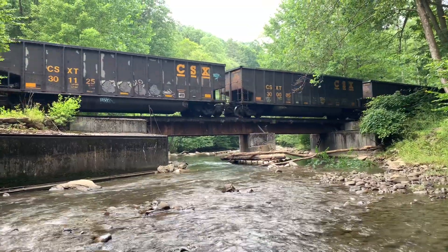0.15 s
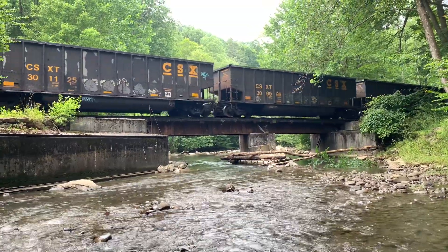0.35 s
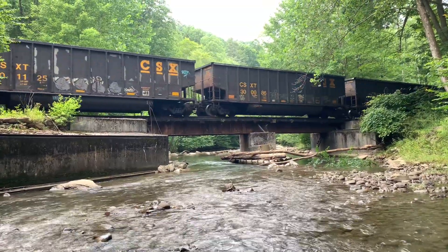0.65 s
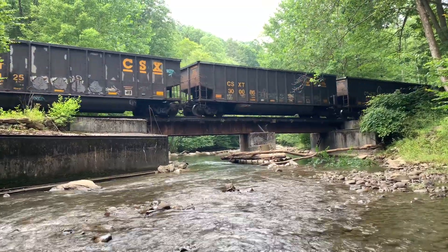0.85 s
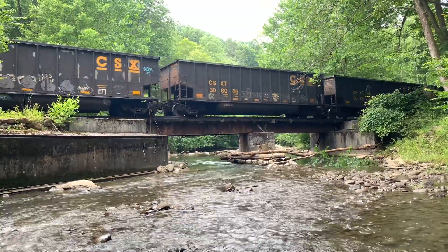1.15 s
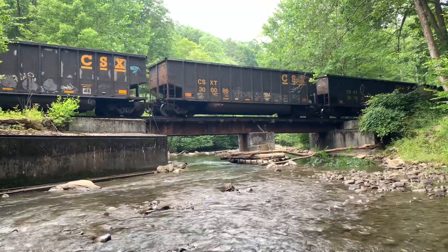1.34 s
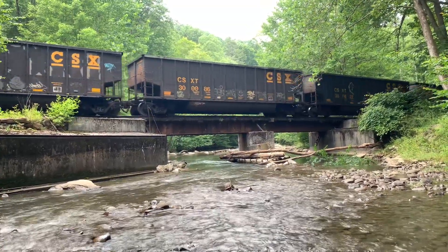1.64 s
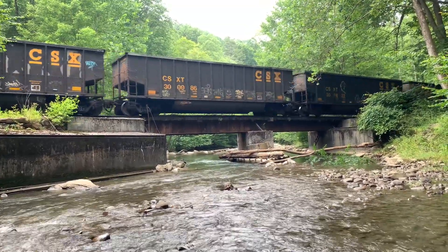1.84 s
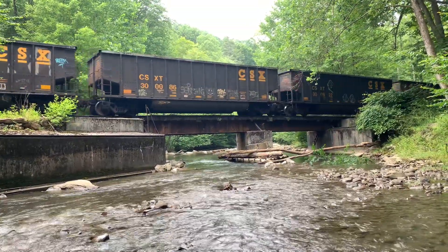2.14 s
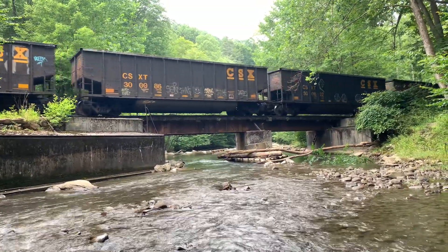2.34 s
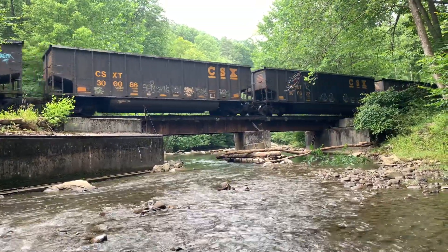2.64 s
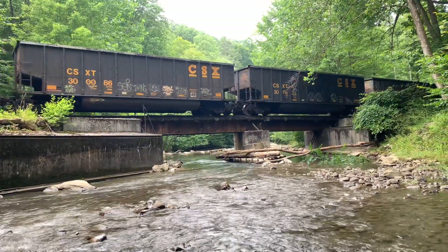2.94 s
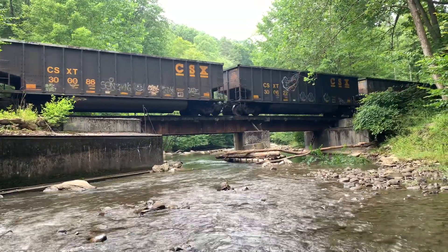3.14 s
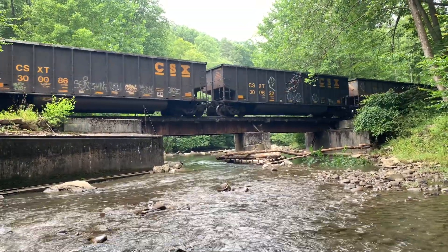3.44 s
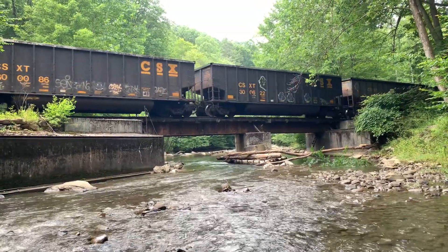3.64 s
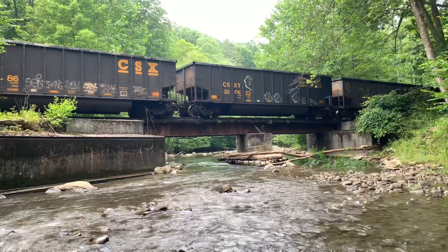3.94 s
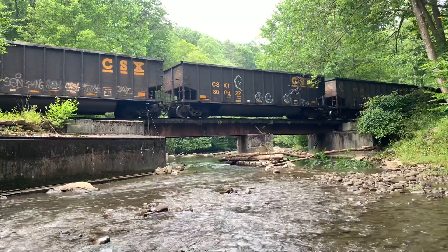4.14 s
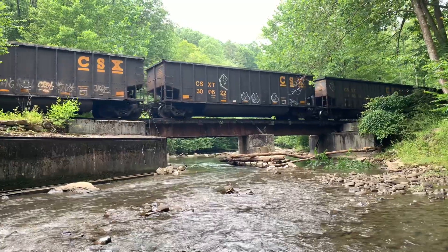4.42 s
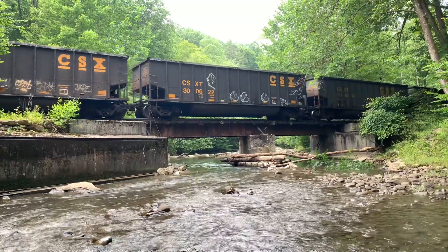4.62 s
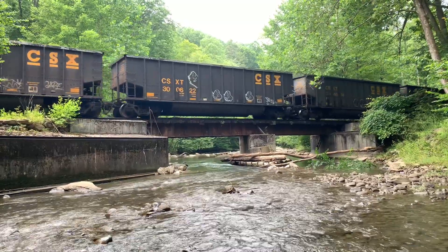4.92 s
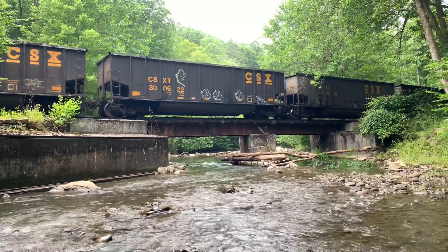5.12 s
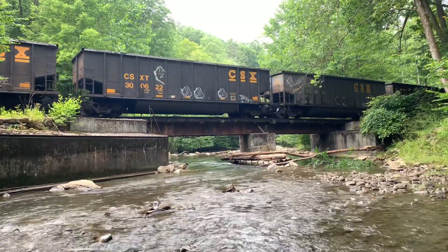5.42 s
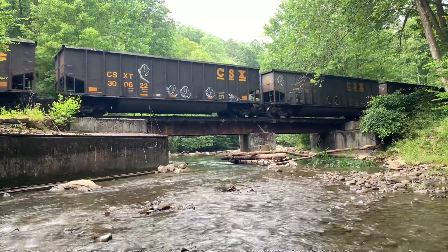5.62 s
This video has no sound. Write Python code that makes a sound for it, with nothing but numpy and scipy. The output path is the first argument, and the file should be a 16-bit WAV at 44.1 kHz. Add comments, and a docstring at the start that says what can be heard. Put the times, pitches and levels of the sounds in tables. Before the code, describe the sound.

Heavy freight cars rumble steadily over a steel girder bridge, wheels knocking in clusters at rail joints with metallic clatter, rattles and faint thin squeals.

```python
"""Freight train on a girder bridge

Loaded hopper cars roll over a steel girder bridge above a shallow creek. Rough treads drive the span's
bending modes; blows at rail joints and in slack gear boom in the girders, clatter and ring the wheels.
Flanges sing thinly now and then by stick and slip, and small ringing bubbles make the water fizz."""
import sys
import numpy as np
from scipy import signal
from scipy.fft import rfft, irfft
from scipy.io import wavfile
from scipy.ndimage import uniform_filter1d

SR = 44100
rng = np.random.default_rng(int(sys.argv[2]) if len(sys.argv) > 2 else 0)


def to_wav(sig):
    """Store sig (one row per channel, or 1-D mono) as 16-bit WAV at the path in sys.argv[1].

    Samples outside -1..1 are clipped; the rate is SR.
    """
    pcm = np.clip(np.atleast_2d(sig), -1, 1) * 32767
    pcm = np.round(pcm).astype(np.int16)
    wavfile.write(sys.argv[1], SR, pcm.T)  # frames by channels


N = 254456
TIME = np.arange(N) / SR
BINS = np.maximum(np.arange(N // 2 + 1) * SR / N, 1)  # Hz

# All levels in the tables are relative; the settings in scene() place each layer.

# Level curves of the bending span and its deck. Each row: time in seconds, level in dB.
DEEP_SWAY = [(0, -22), (.28, -29), (.55, -23), (.85, -22.5), (1.05, -23.5), (1.4, -21), (1.75, -25.5),
             (2.1, -20.5), (2.55, -19), (2.8, -21), (3.0, -20.5), (3.45, -26.5), (3.85, -20), (4.2, -27),
             (4.7, -23.5), (5.4, -20.5), (5.65, -20), (5.77, -31)]  # range of the deepest bending mode
UPPER_SWAY = [(0, -26), (.18, -23.5), (.31, -18.5), (.55, -24), (.9, -24), (1.1, -22.5), (1.45, -21),
              (1.65, -18), (1.95, -27), (2.45, -22), (2.75, -26.5), (3.2, -29), (3.35, -22.5), (3.55, -25),
              (4.1, -23.5), (4.35, -20.5), (5.2, -21.5), (5.77, -24)]  # range of the second bending mode
DECK_DRUM = [(0.0, -28.5), (2.17, -26.5), (4.03, -28), (4.13, -30.5), (4.32, -30.5), (4.5, -22.5),
             (4.53, -26.5), (4.85, -31), (4.87, -27), (5.16, -27.5), (5.26, -21.5), (5.37, -33),
             (5.56, -26.5), (5.77, -26.5)]  # drumming of the deck
DEEP_TOP_HZ, UPPER_TOP_HZ = 72, 112  # where the three ranges meet
# Bending resonances of the span. Each row: frequency in Hz, width in Hz, lift in dB.
GIRDER_MODES = [(57, 9, 5), (87, 9, 5.5), (131, 8, 2.5), (171, 8, 6.5)]

# Rolling between the knocks. Each row: time in seconds, roar level in dB, hiss level in dB.
ROLLING = [(0.0, -34.5, -44), (0.29, -34.5, -44.5), (0.66, -36.5, -47), (1.53, -35.5, -48.5),
           (2.01, -34.5, -45.5), (2.23, -35, -46), (3.25, -35.5, -47), (3.97, -37.5, -47),
           (4.23, -35.5, -47.5), (4.9, -36, -47), (5.48, -34.5, -48), (5.77, -35.5, -45.5)]

# Spectra of the radiating bodies. Each row: frequency in Hz, level in dB per Hz.
SPAN_SPECTRUM = [(12, -28), (26, -1), (42, -0.5), (58, 4), (73, -2), (90, -2), (104, -8.5), (145, -11),
                 (200, -19), (250, -31), (290, -50), (380, -69), (1500, -110)]
ROAR_SPECTRUM = [(150, -65), (230, 5.5), (295, -13), (360, 1.5), (540, 2.5), (690, -1), (810, -11),
                 (1050, -8.5), (1900, -13.5), (2600, -18), (3600, -65), (8000, -64)]
HISS_SPECTRUM = [(500, -3.5), (1500, 7.5), (2800, 3), (4100, 4), (5000, -4.5), (6300, -0.5), (7200, -12),
                 (8400, -1.5), (10300, -7), (12200, -23), (13400, -14.5), (14600, -38)]
BOOM_SPECTRUM = [(120, -53), (295, -2), (360, 1), (450, 2), (530, 11.5), (690, 8.5), (820, -9), (1300, -54),
                 (5000, -80)]  # girders under a blow
CLATTER_SPECTRUM = [(250, -50), (600, -40), (830, -21), (1050, 9.5), (1400, 7), (1650, 6), (2150, 5),
                    (2700, -27), (3400, -16), (9000, -76)]  # sheet steel of the cars
CLANG_SPECTRUM = [(900, -37), (2000, 7), (2800, 2.5), (4100, 2.5), (5100, -7), (6400, 0), (7200, -9),
                  (9500, -8), (12000, -23.5), (15000, -26)]  # running gear
CRACK_SPECTRUM = [(1200, -15), (2500, 3.5), (3300, -2), (4400, -5), (5100, -22), (5700, 5), (6500, -12),
                  (7300, -7.5), (9800, -7), (12000, -17), (15000, -34)]  # steel on steel

# Rail joints. Each row: first axle in seconds, crossing time in seconds, clatter in dB, girder boom in dB,
# gear clang in dB, girder note in Hz, panel note in Hz, second wheel in dB, then axles 1 to 4 in dB.
JOINTS = [(0.126, 1.100, -23, -33, -47, 544, 1200, -7.5, 0, -1.5, -8.5, -4),
          (0.289, 1.113, -32, -33.5, -46, 509, 1556, -6.5, 1, -6, 3, 2),
          (1.700, 1.083, -24, -26.5, -44, 481, 1107, -3, -3.5, -4, 2, -2),
          (1.785, 1.080, -25, -29, -44.5, 443, 1360, -3, 0, -0.5, -3, -16),
          (1.835, 1.075, -19.5, -25, -49, 554, 1155, -16, -9.5, -7, -9, -5)]
# Single knocks, faint to heavy, of wheels and slack gear. Each row: time in seconds, clatter in dB,
# girder boom in dB, gear clang in dB, girder note in Hz, panel note in Hz, panel ring in dB.
SINGLE_KNOCKS = [(0.138, -33, -40, -50, 540, 1930, -42), (0.205, -35, -24.5, -60, 525, 1350, -39),
                 (0.645, -26, -24, -43.5, 543, 960, -41), (0.715, -40, -37, -60, 563, 920, -40.5),
                 (0.875, -25.5, -37, -50, 525, 1145, -39), (0.89, -34, -45, -46, 509, 1720, -43),
                 (1.052, -38, -32, -59, 483, 1700, -42), (1.23, -41, -49, -55, 540, 2000, -44),
                 (1.407, -24.5, -25, -60, 500, 1620, -32), (2.048, -22, -29, -40, 564, 2620, -35.5),
                 (2.172, -25, -27, -52, 502.8, 1010, -47), (2.431, -35, -35, -55, 494, 1134, -38),
                 (2.472, -25, -26, -45, 489, 2040, -40), (2.545, -37, -32, -45, 448, 1220, -46),
                 (2.679, -32, -35, -59, 602.4, 1187, -36), (2.812, -22, -27, -42, 527, 1693, -39),
                 (2.908, -31, -26.5, -60, 670, 1440, -45), (3.115, -40, -45, -60, 545, 1420, -38.5),
                 (3.168, -33, -37, -58, 533, 1030, -43), (3.19, -21.5, -33, -41.5, 494, 1870, -42),
                 (3.24, -28, -23.5, -60, 633, 1756, -44), (3.345, -25, -24.5, -42, 534, 1360, -44),
                 (3.54, -40, -33, -53, 570, 1073, -35), (3.688, -41, -29, -54, 472, 1440, -48),
                 (3.935, -27, -42, -62, 570, 1910, -44), (4.105, -22.5, -22.5, -43, 488, 1366, -38.5),
                 (4.285, -34, -43, -52, 524, 1980, -44), (4.36, -28, -28, -52, 522, 1187, -44),
                 (4.40, -33, -43, -60, 510, 1330, -43), (4.46, -28, -26.5, -57, 533, 1647, -36),
                 (4.752, -33, -38, -48, 523, 1675, -40), (4.800, -40, -41, -40, 670, 1064, -52),
                 (4.848, -20, -32, -44, 583, 1960, -35), (4.925, -21, -28, -48, 447, 1750, -40),
                 (5.098, -27, -28.5, -53, 558, 2660, -42), (5.214, -27, -23, -47, 550, 1970, -37),
                 (5.477, -19, -42, -50, 520, 1015, -34), (5.503, -29, -23, -43, 515, 2550, -36.5),
                 (5.522, -38, -23, -58, 441, 1144, -47), (5.568, -36, -40, -51, 516, 2190, -42)]
# The four axles either side of a coupler. Each entry: share of the crossing time.
AXLES = [0, .321, .678, 1]
# Cars in order of passing, the heavier booming more in the girders. Each entry: added boom in dB.
CARS_BOOM_DB = [1.5, 0]
CAR_S = 3.05  # one car passes in this time, so the same group of axles strikes each joint again
SECOND_WHEEL_S = .029  # delay between the two wheels of an axle
SCATTER_DB, SCATTER_OCTAVES = -2.04, .1  # factors on normal chance for strength and girder pitch
JOINT_PANEL_DB = -13.5  # panel ring relative to the clatter at a joint

# A truck drops its weight on the deck. Each row: time in seconds, level in dB, central pitch in Hz.
THUDS = [(1.038, -17, 131), (1.37, -17.5, 127.7), (1.82, -21, 176.7), (2.048, -25, 165), (2.23, -22, 174),
         (2.43, -22, 151.4), (2.561, -29, 162), (2.789, -19.5, 138), (3.32, -30, 136.7),
         (4.101, -17.5, 151.8), (4.111, -26, 204), (4.449, -22, 147), (4.87, -21, 181.4),
         (5.22, -15.5, 146), (5.49, -25, 160.6), (5.649, -19.5, 158.8)]

# Wheel modes. Each row: frequency in Hz, level in dB, 60 dB decay time in seconds.
WHEEL_MODES = [(2606, -1, .3), (3165, -4, .25), (3240, -6, .3), (3332, -6, .45), (3787, -1, .36),
               (4016, -5, .75), (4521, -6, .7), (4813, -9, .55), (5035, -14, .7), (5595, -11, .7),
               (5690, -3, .85), (6215, -10, .45), (6460, -4, .65)]
# Hard blows that ring a wheel. Each row: time in seconds, ring in dB, most excited pitch in Hz,
# reach in octaves, this wheel's tuning in cents, chatter in dB, crack in dB.
WHEEL_BLOWS = [(0.314, -37.5, 3450, .25, 3.5, -51, -41), (1.049, -36, 3300, 0.2, 1, -48, -50),
               (1.404, -51, 3800, .4, 1, -55, -43), (1.697, -45, 3700, .4, -1, -57, -34),
               (2.043, -38, 5770, 0.5, -12.5, -54, -34), (2.15, -48, 5700, 0.54, -13, -54, -35),
               (2.455, -39, 4960, 0.7, 1, -52, -36), (2.547, -38, 4230, .2, 5.5, -49, -47),
               (2.815, -46, 6100, 0.18, -2, -51, -48), (3.348, -35, 3360, 0.23, -2.5, -46, -42),
               (4.119, -29.5, 3720, 0.21, 0, -35, -30), (4.752, -39, 2600, 0.22, -2, -41, -34),
               (4.80, -41, 4470, 0.58, -16, -51, -45), (5.498, -43, 5900, .35, 3, -49, -39),
               (5.533, -41, 3370, 0.5, -3, -47, -46), (5.565, -41.5, 5600, 0.68, 2.5, -56, -48)]

# Flange squeals. Each row: start in seconds, swell in seconds, length in seconds, pitch in Hz,
# glide in Hz per second, width of the bunch in Hz, level in dB, left minus right in dB.
SQUEALS = [(-.02, 0.045, 0.2, 8160, 0, 99, -46.5, -6), (0.077, 0.043, 0.23, 8620, -3, 85, -42.5, -7),
           (0.625, 0.037, 0.22, 8630, -300, 120, -47, -11), (.904, 0.02, 0.19, 9560, 0, 80.5, -51.5, -6),
           (1.84, .025, .08, 7800, -3000, 90, -49, -2), (3.017, 0.12, 0.41, 8500, 0, 455, -48.5, -6),
           (3.223, 0.021, 0.24, 9650, -300, 64.2, -45, -6), (3.26, 0.038, .18, 10100, 0, 90, -63, -7),
           (3.31, 0.17, .31, 13880, -700, 191, -50, 0), (3.423, 0.18, .47, 13400, 0, 400, -57, 0),
           (3.87, .18, 0.45, 11900, 0, 380, -64, -3), (4.67, 0.23, 0.44, 8670, 0, 443, -55, -1),
           (5.01, 0.1, 0.5, 8170, 2, 95, -49, -5.5)]

# Stereo image. Each row: frequency in Hz, side minus mid in dB.
WIDTH = [(35, -14), (55, -26), (75, -16), (110, -11.5), (180, -2), (288, 13.5), (345, 6), (450, -9),
         (590, -5.5), (800, 4.5), (1300, -1.5), (2250, 1.5), (3250, 2.5), (3750, -5.5), (4900, 5),
         (6200, -7), (7400, 3.5), (8600, -4.5), (11000, 4), (13700, -9)]
# Stereo balance. Each row: frequency in Hz, left minus right in dB.
LEAN = [(480, -0.14), (680, -2), (850, -0.5), (1050, 0.3), (1250, -1), (7700, -1.3), (8100, -10.5),
        (10000, -5.5), (12500, 0)]
# Part of the side a quarter cycle from the mid: ahead if positive, behind if negative.
# Each row: frequency in Hz, signed share of the side's amplitude.
QUADRATURE = [(42, -.6), (85, .97), (260, .97), (310, -.75), (370, -.85), (450, -.35), (770, -.35),
              (880, .92), (1020, .8), (1170, .05), (1450, .45), (1900, -.4), (2450, -.25), (2700, .15),
              (4500, .05), (5600, -.4), (6500, .25), (7900, -.1)]
CUTOFF_HZ = 14400


def from_db(db):
    """Amplitude gain is ten to the power of dB over twenty."""
    return 10 ** (np.asarray(db) / 20)


def rms_one(x):
    """Normalization to unit mean power."""
    return x / np.sqrt(np.mean(x ** 2) + 1e-20)


def in_time(rows):
    """Linear interpolation of each column of a curve at every sample."""
    s, *columns = np.transpose(rows)
    return [np.interp(TIME, s, c) for c in columns]


def colour(points):
    """Interpolation of a spectrum over log frequency, at every frequency bin."""
    hz, values = np.transpose(points)
    return np.interp(np.log(BINS), np.log(hz), values)


def drift(rate_hz):
    """Low-passed noise of unit power: a slow random fluctuation."""
    return rms_one(irfft(rfft(rng.standard_normal(N)) / (1 + (BINS / rate_hz) ** 2), N))


def radiate(spectrum_db, drive=None):
    """Linear response: a body's spectrum filters two rows of drive, by default unrelated noises; rms 1."""
    drive = rng.standard_normal((2, N)) if drive is None else drive
    return rms_one(irfft(rfft(drive) * from_db(spectrum_db), N))


def ring(clicks, hz, t60):
    """Damped oscillator: each unit click sets a decaying sine of height 1 ringing."""
    radius = from_db(-60 / (t60 * SR))
    angle = 2 * np.pi * min(hz, .45 * SR) / SR
    feedback = [1, -2 * radius * np.cos(angle), radius * radius]
    return signal.lfilter([0, np.sin(angle)], feedback, clicks + 1e-18)


def grains(per_s, spread_db):
    """Random impulses: two rows of clicks of either sign, uneven in size unless the spread is zero."""
    sizes = from_db(spread_db * np.minimum(rng.exponential(1, (2, N)), 4))
    signs = rng.choice([-1, 1], (2, N))
    return sizes * signs * (rng.random((2, N)) < per_s / SR)


def add_at(out, start, sound):
    """Superposition: add a sound from a sample onward, cut at the end."""
    room = out[:, start:start + sound.shape[1]]
    room += sound[:, :room.shape[1]]


def ring_down(times, levels_db, rise_s, t60, tail_db, tail_t60):
    """Energy decay in two stages: it spreads, dies quickly, then echoes along the valley; gives amplitude."""
    power = np.zeros(N)
    for s, db in zip(times, levels_db):
        start = max(int(s * SR), 0)
        age = TIME[:min(N - start, SR)]
        spreading = 1 - np.exp(-(age / rise_s) ** 2)
        dying = from_db(-60 * age / t60) ** 2 + from_db(tail_db - 60 * age / tail_t60) ** 2
        power[start:start + len(age)] += from_db(db) ** 2 * spreading * dying
    return np.sqrt(power)


def notes(times, levels_db, pitches, rise_s, t60, spread):
    """Modal clusters: a struck member answers in six modes per row, close around its own note."""
    out, age = np.zeros((2, N)), TIME[:SR // 3]
    fade = (1 - np.exp(-(age / rise_s) ** 2)) * from_db(-60 * age / t60)
    for s, db, hz in zip(times, levels_db, pitches):
        cluster = hz * (1 + spread * rng.uniform(-0.984, 1, size=(2, 6, 1)))
        phase = rng.random(size=(2, 6, 1))
        tone = np.sin(2 * np.pi * (cluster * age + phase)).sum(1) * fade
        level = from_db(db) * fade.std() / tone.std(1, keepdims=True)
        add_at(out, max(int(s * SR), 0), level * tone)
    return out


def rumble(level_db, deck_db, steadiness):
    """Forced bending: rough treads shake the span; two modes surge in turn under the deck's drumming."""
    response = colour(SPAN_SPECTRUM)
    for hz, width, lift_db in GIRDER_MODES:
        response = response + lift_db / (1 + (2 * (BINS - hz) / width) ** 2)
    ranges = ((0, DEEP_TOP_HZ, in_time(DEEP_SWAY)[0]),
              (DEEP_TOP_HZ, UPPER_TOP_HZ, in_time(UPPER_SWAY)[0]),
              (UPPER_TOP_HZ, SR, in_time(DECK_DRUM)[0] + deck_db))
    out = 0
    for low, high, db in ranges:
        band_loss_db = 10 * np.log10(1 + (low / BINS) ** 20 + (BINS / high) ** 20)
        shake = radiate(response - band_loss_db)
        # even out the chance swells of the noise before the level curve shapes it
        swell = uniform_filter1d(shake[0] ** 2, size=SR // 7)
        steady = shake / swell ** (np.clip(steadiness, 0, 1) / 2)
        out = out + from_db(db + level_db) * rms_one(steady)
    return out


def rolling(roar_db, hiss_db, flutter_db):
    """Contact roughness: tiny contacts of tread and rail merge into a grainy roar and a hiss."""
    roar_curve, hiss_curve = in_time(ROLLING)
    flutter = flutter_db * drift(rate_hz=6.2)
    roar = radiate(colour(ROAR_SPECTRUM), grains(per_s=1800, spread_db=0.0))
    roar = from_db(roar_curve + roar_db + flutter) * roar
    hiss = from_db(hiss_curve + hiss_db + 0.18 * flutter) * radiate(colour(HISS_SPECTRUM))
    return roar + hiss


def knock_rows():
    """Periodic impact: each axle of each car strikes every joint, wheel after wheel; single knocks are added."""
    rows = list(SINGLE_KNOCKS)
    for first_s, crossing_s, clatter, boom, clang, girder_hz, panel_hz, second_db, *axle_db in JOINTS:
        for car, load_db in enumerate(CARS_BOOM_DB):
            for share, weight_db in zip(AXLES, axle_db):
                for late_s, wheel_db in (0, 0), (SECOND_WHEEL_S, second_db):
                    force, girder, panel = rng.standard_normal(3)
                    db = weight_db + wheel_db + SCATTER_DB * force
                    time = first_s + car * CAR_S + share * crossing_s + late_s
                    girder_note = girder_hz * 2 ** (SCATTER_OCTAVES * girder)
                    panel_note = panel_hz * 2 ** (2 * SCATTER_OCTAVES * panel)
                    rows.append((time, clatter + db, boom + db + load_db, clang + db,
                                 girder_note, panel_note, clatter + db + JOINT_PANEL_DB))
    return np.array([row for row in rows if row[0] < N / SR])


def knocks(hits, boom_db, clatter_db, clang_db):
    """Impact radiation: a blow sets off contacts in girders, the car's sheet steel and running gear."""
    s, clatter, boom, clang, *_ = hits.T
    girders = ring_down(s, boom + boom_db, rise_s=0.009, t60=0.23, tail_db=-19.0, tail_t60=1.0)
    girders = girders * radiate(colour(BOOM_SPECTRUM))
    sheets = ring_down(s, clatter + clatter_db, rise_s=0.0013, t60=0.22, tail_db=-20.0, tail_t60=0.34)
    sheets = sheets * radiate(colour(CLATTER_SPECTRUM), grains(per_s=1200, spread_db=2.0))
    gear = ring_down(s, clang + clang_db, rise_s=0.0088, t60=0.087, tail_db=-7.0, tail_t60=0.76)
    gear = gear * radiate(colour(CLANG_SPECTRUM), grains(per_s=6500, spread_db=-4.5))
    return girders + sheets + gear


def clanks(hits, girder_db, panel_db):
    """Modal response: a girder bay and a side panel give the knocks their pitch."""
    s, _, boom, _, girder_hz, panel_hz, panel = hits.T
    bays = notes(s, boom + girder_db, girder_hz, rise_s=0.015, t60=0.19, spread=0.1505)
    panels = notes(s, panel + panel_db, panel_hz, rise_s=0.0035, t60=0.27, spread=0.015)
    return bays + panels


def rattles(hits, level_db, bounce_s, t60, uneven_db):
    """Secondary impact: thrown doors and latches land on their stops a moment later, each at its own pitch."""
    s, clatter, *_ = hits.T
    out, count = np.zeros((2, N)), 32
    for hz in np.geomspace(960, 2700, count) * rng.uniform(.985, 1.015, count):
        taps = np.zeros((2, N + SR))  # room for landings past the end
        landing = s + bounce_s * np.minimum(rng.exponential(1, (2, len(s))), 4)
        force = np.clip(rng.standard_normal((2, len(s))), -2, 2)
        taps[[[0], [1]], (landing * SR).astype(int)] = from_db(clatter + level_db + uneven_db * force)
        out += ring(taps[:, :N], hz, t60)
    return out / np.sqrt(count / 2)


def thuds(rise_s, t60, spread):
    """Plate response: the deck answers a dropping truck with a dull, slow thud."""
    return notes(*np.transpose(THUDS), rise_s, t60, spread)


def wheels(level_db, off_centre_db, contact_s):
    """Selective excitation: a struck wheel rings most in the modes its contact point favours."""
    out, age = np.zeros((2, N)), TIME[:SR * 3 // 4]
    hz, mode_db, t60 = np.transpose(WHEEL_MODES)
    fades = from_db(mode_db[:, None] - 60 * age / t60[:, None]) * np.minimum(age / contact_s, 1)
    for s, db, centre, reach, cents, _, _ in WHEEL_BLOWS:
        gains = from_db(db + level_db + off_centre_db * (np.log2(hz / centre) / reach) ** 2)
        tuned_hz = hz[:, None] * 2 ** (cents / 1200)  # no two wheels are tuned quite alike
        modes = fades * np.sin(2 * np.pi * tuned_hz * age)
        signs = rng.choice([-1, 1], (2, len(hz)))
        add_at(out, int(s * SR), (gains * signs) @ modes)
    return out * from_db([[0], [-5]])  # mostly direct sound


def wheel_chatter(level_db, width_hz, t60):
    """Repeated contact: a wheel bouncing on the rail gives a short rough clang near the favoured pitch."""
    out, count = np.zeros((2, N)), 16384
    age, hz = TIME[:count], np.arange(count // 2 + 1) * SR / count
    fade = (1 - np.exp(-age / 0.01)) * from_db(-60 * age / t60)
    for s, _, centre, _, _, db, _ in WHEEL_BLOWS:
        resonance = 1 / (1 + ((hz - centre) / width_hz) ** 2)
        rough = rms_one(irfft(rfft(rng.standard_normal((2, count))) * resonance, count))
        add_at(out, int(s * SR), from_db(db + level_db) * fade * rough)
    return out


def cracks(level_db, rise_s, t60):
    """Hard impact: steel meets steel, and a wheel blow opens with a short bright crack."""
    s, *_, crack_db = np.transpose(WHEEL_BLOWS)
    envelope = ring_down(s, crack_db + level_db, rise_s, t60, tail_db=-13, tail_t60=0.72)
    return envelope * radiate(colour(CRACK_SPECTRUM), grains(per_s=3000, spread_db=1.0))


def flanges(level_db, fade, slips_per_s, flicker_db):
    """Stick-slip friction: a bunch of close high partials swells and fades, each flaring up on its own."""
    out, count = np.zeros((2, N)), 12
    for s, swell_s, length, hz, glide, width, db, pan_db in SQUEALS:
        age, tone = TIME[:int(length * SR)], 0
        offsets = width * np.append(0, rng.uniform(-2, 2, count - 1))
        for offset in offsets:
            grip, phase = rng.standard_normal((2, 2, 256))
            slips = from_db(flicker_db * np.clip(grip, -2, 2)) * np.exp(2j * np.pi * phase)
            flare = np.array([np.interp(age * slips_per_s, np.arange(len(row)), row) for row in slips])
            carrier = np.exp(2j * np.pi * (hz + offset + glide * age / 2) * age)
            tone = tone + (flare * carrier).real / (1 + (offset / width) ** 2)
        start = max(int(s * SR), 0)
        since_start = start / SR + age - s
        swell = np.interp(since_start, [0, min(swell_s, length / 2), length], [0, 1, 0]) ** fade
        gain = from_db(db + level_db + pan_db * np.array([[.5], [-.5]]))
        add_at(out, start, gain * swell * rms_one(tone))
    return out


def loose_parts(level_db, per_s, t60, tilt_db):
    """Random excitation: chains, doors and brake rods along the train jangle, each at its own pitch."""
    out, count = np.zeros((2, N)), 64
    pitches = np.geomspace(900, 4600, count) * rng.uniform(.985, 1.015, count)
    hits = max(int(per_s * N / SR), 1)
    for hz in pitches:
        taps = np.zeros((2, N))
        taps[[[0], [1]], rng.integers(0, N, (2, hits))] = from_db(3 * rng.standard_normal((2, hits)))
        out += from_db(tilt_db * np.log2(hz / pitches[0]) ** 2) * ring(taps, hz, t60)
    return from_db(in_time(ROLLING)[0] + level_db) * rms_one(out)  # follows the roar curve


def creek(level_db, per_s, cycles):
    """Bubble resonance: small bubbles burst in the riffles, each dying by 60 dB in a set number of cycles."""
    pitches = np.geomspace(900, 8000, 16)
    bursts = grains(per_s, spread_db=2)
    dealt = rng.integers(0, len(pitches), N)  # which pitch each burst takes
    water = sum(ring(bursts * (dealt == k), hz, cycles / hz) for k, hz in enumerate(pitches))
    return from_db(level_db) * rms_one(water)


def microphones(field):
    """Mid-side stereo: row one is the mid; the side mixes its phase-shifted copy with the diffuse row two."""
    mid, diffuse = rfft(field)
    share = np.clip(colour(QUADRATURE), -.99, .99)
    side = (1j * share * mid + np.sqrt(1 - share ** 2) * diffuse) * from_db(colour(WIDTH))
    balance = from_db(colour(LEAN) * [[.5], [-.5]])
    return irfft((mid + side * [[1], [-1]]) * balance, N)


def scene():
    """Superposition of the train on the span and the creek; the squeals carry their own stereo balance."""
    bed = rumble(level_db=1.13, deck_db=-1.0, steadiness=1.0)
    bed = bed + rolling(roar_db=-2.5, hiss_db=-0.15, flutter_db=1.3)
    bed = bed + loose_parts(level_db=-8.4, per_s=4, t60=.17, tilt_db=-2.1)
    bed = bed + creek(level_db=-56.5, per_s=1700, cycles=15)
    hits = knock_rows()
    blows = knocks(hits, boom_db=-3.0, clatter_db=-16.0, clang_db=4.0)
    blows = blows + clanks(hits, girder_db=0.5, panel_db=0.5)
    blows = blows + rattles(hits, level_db=-15.5, bounce_s=.012, t60=.17, uneven_db=4)
    blows = blows + thuds(rise_s=0.0066, t60=0.42, spread=0.1)
    blows = blows + wheels(level_db=-4, off_centre_db=-10, contact_s=.004)
    blows = blows + wheel_chatter(level_db=3.0, width_hz=120, t60=0.15)
    blows = blows + cracks(level_db=-2.0, rise_s=0.0051, t60=0.053)
    squeals = flanges(level_db=1.0, fade=1.07, slips_per_s=39.2, flicker_db=9.0)
    return microphones(bed + blows) + squeals


def record(dry):
    """Band limiting: a steep elliptic low-pass cuts the top."""
    low_pass = signal.ellip(10, .1, 80, CUTOFF_HZ, fs=SR, output="sos")
    return signal.sosfilt(low_pass, dry)


dry = scene()
out = record(dry)
to_wav(out)
```